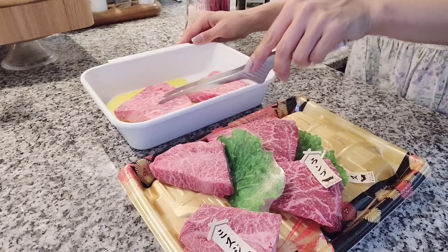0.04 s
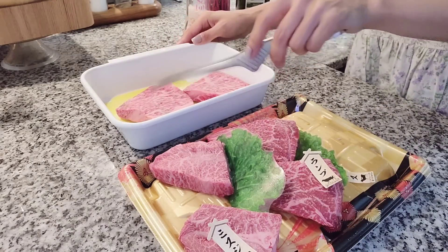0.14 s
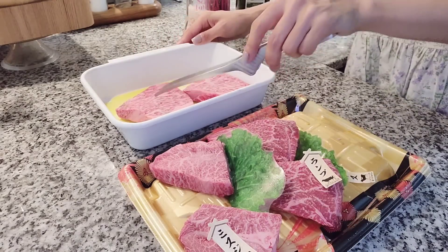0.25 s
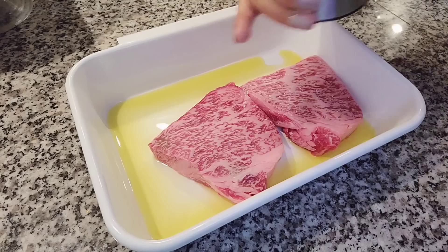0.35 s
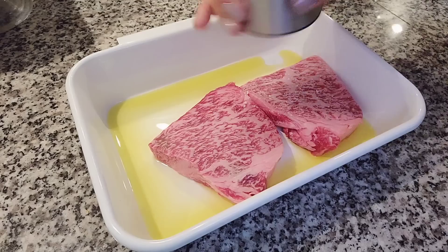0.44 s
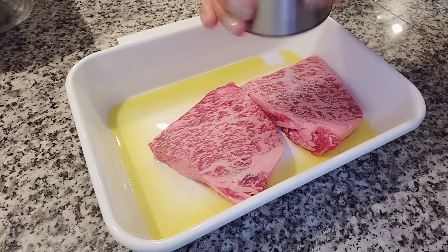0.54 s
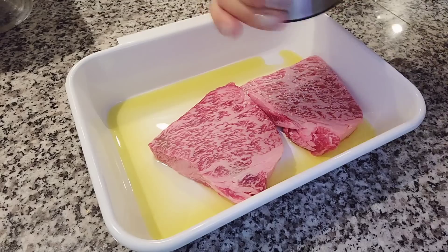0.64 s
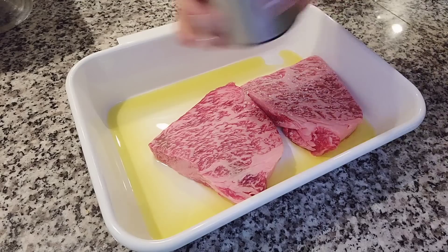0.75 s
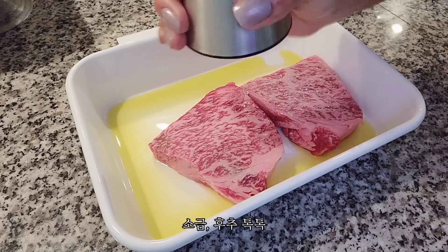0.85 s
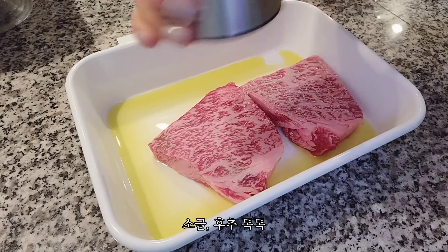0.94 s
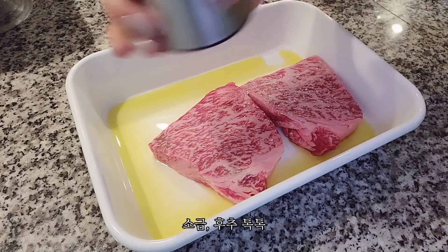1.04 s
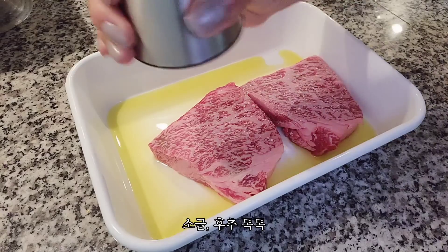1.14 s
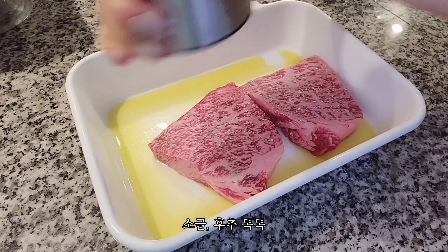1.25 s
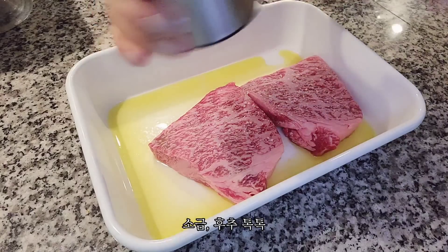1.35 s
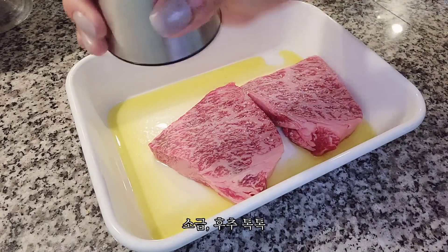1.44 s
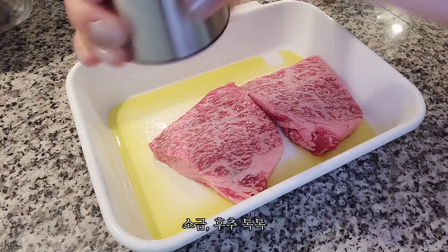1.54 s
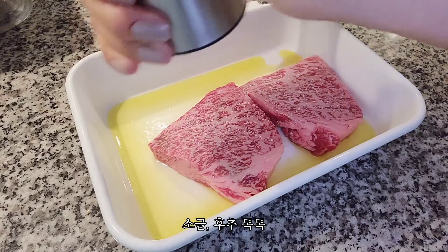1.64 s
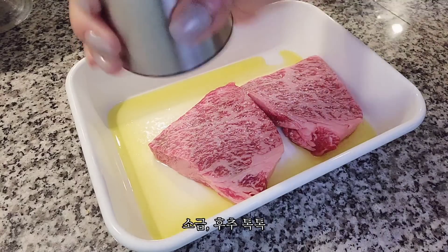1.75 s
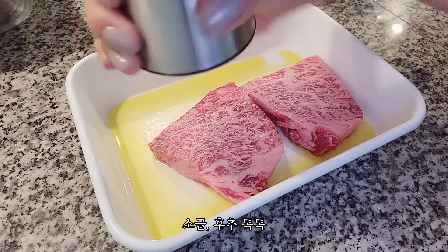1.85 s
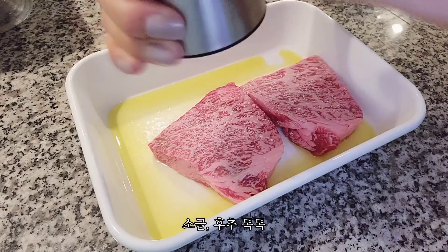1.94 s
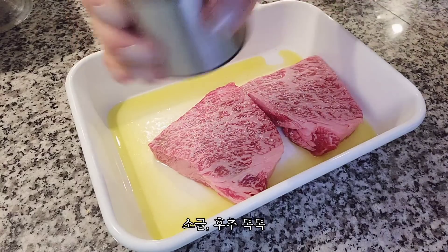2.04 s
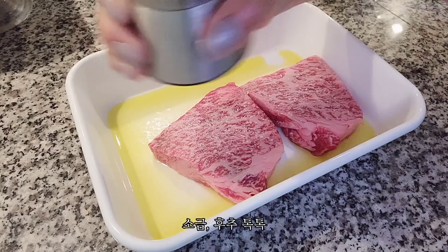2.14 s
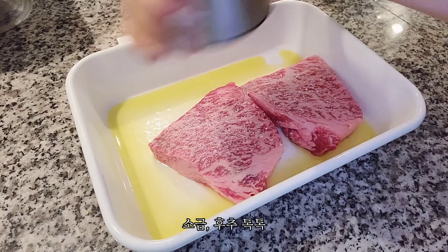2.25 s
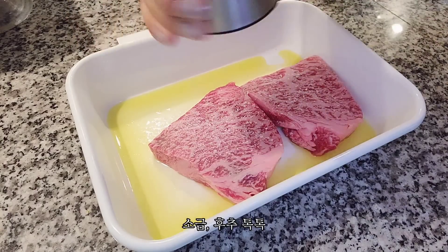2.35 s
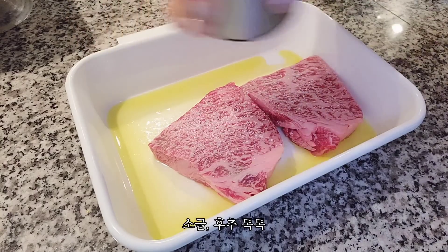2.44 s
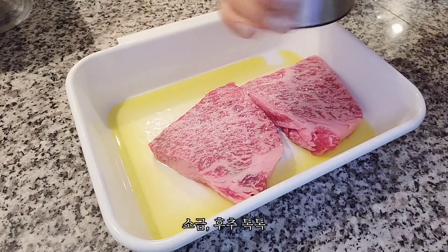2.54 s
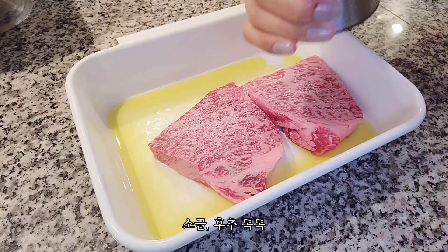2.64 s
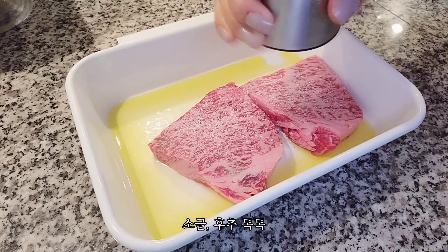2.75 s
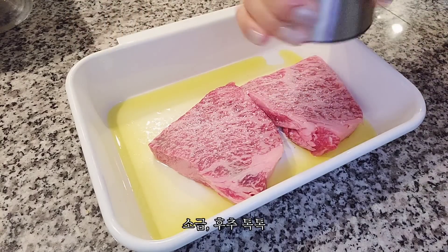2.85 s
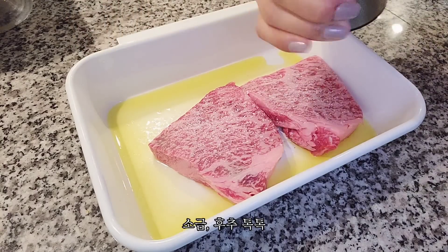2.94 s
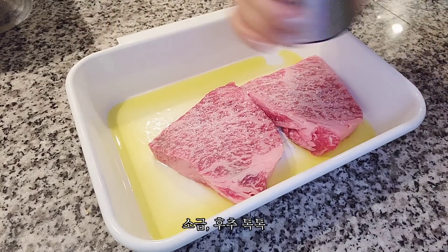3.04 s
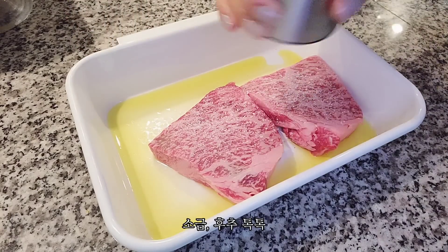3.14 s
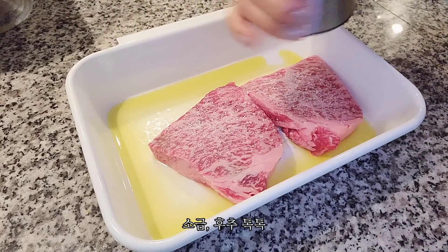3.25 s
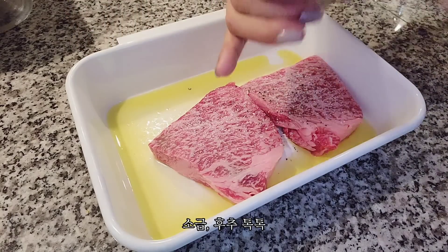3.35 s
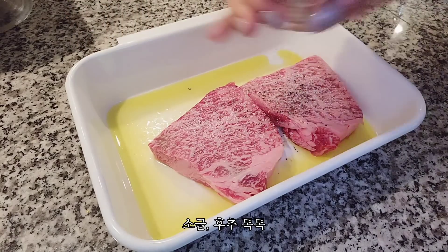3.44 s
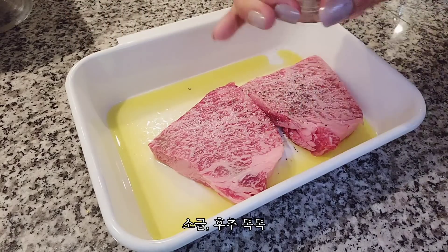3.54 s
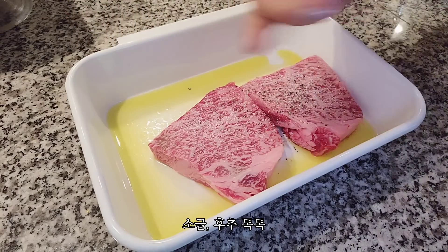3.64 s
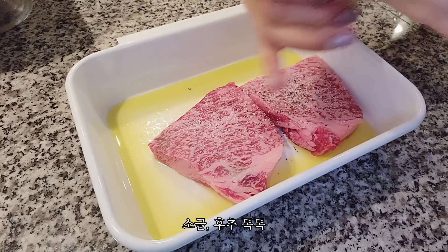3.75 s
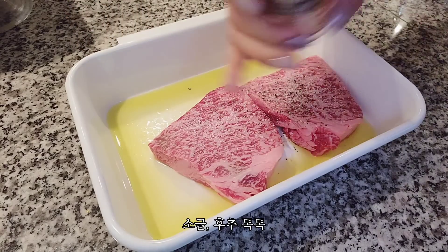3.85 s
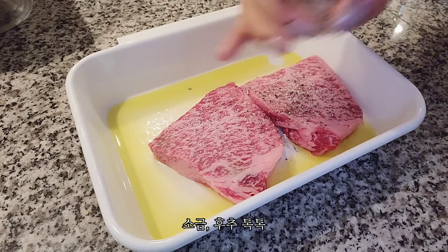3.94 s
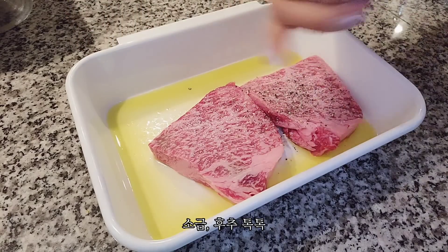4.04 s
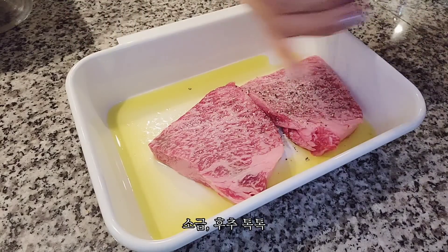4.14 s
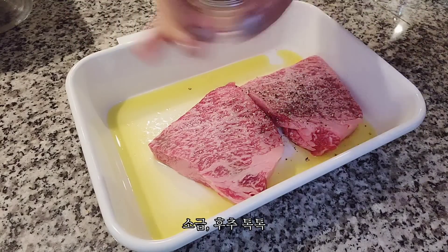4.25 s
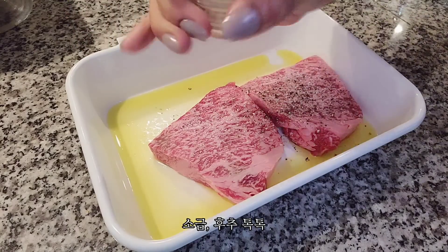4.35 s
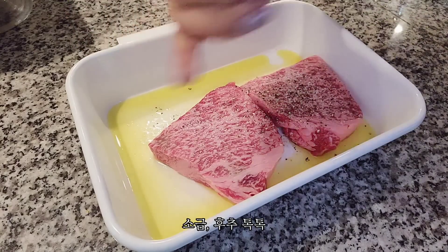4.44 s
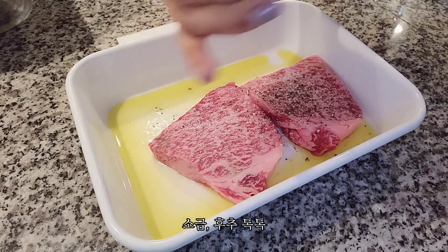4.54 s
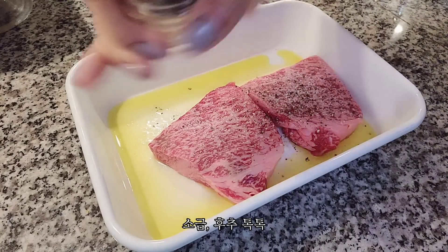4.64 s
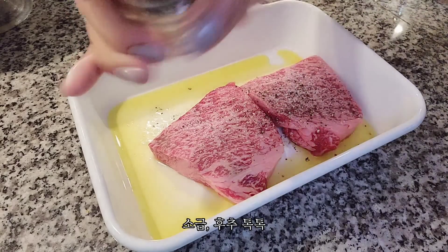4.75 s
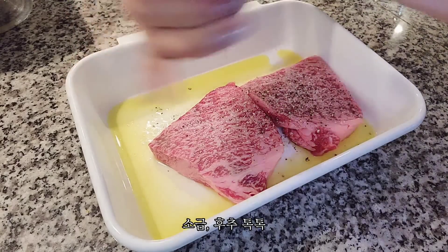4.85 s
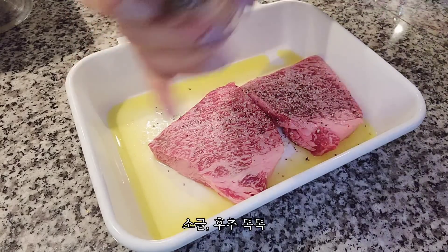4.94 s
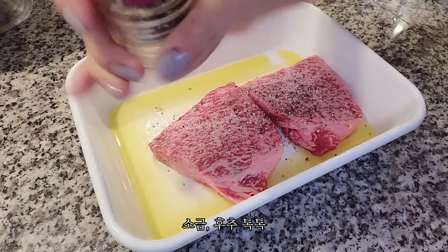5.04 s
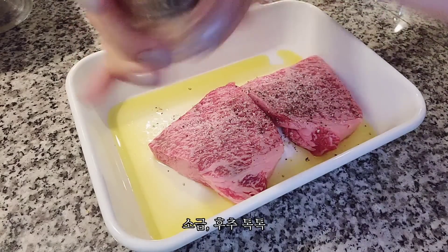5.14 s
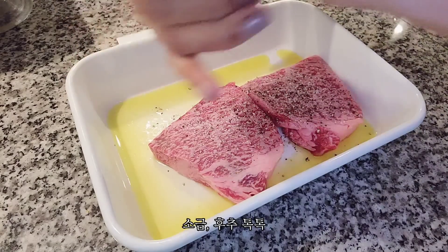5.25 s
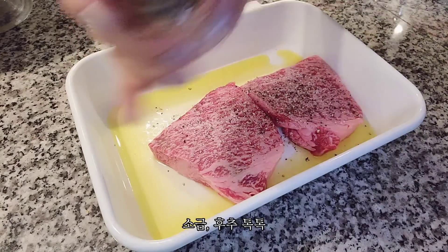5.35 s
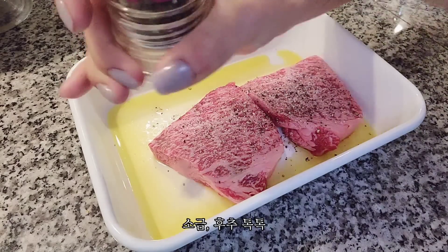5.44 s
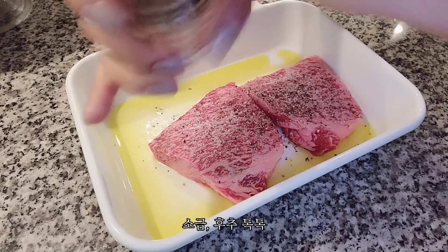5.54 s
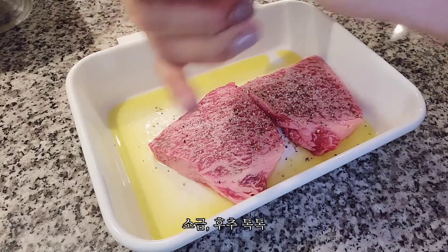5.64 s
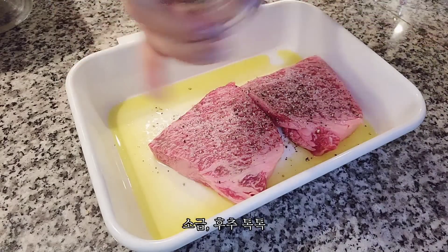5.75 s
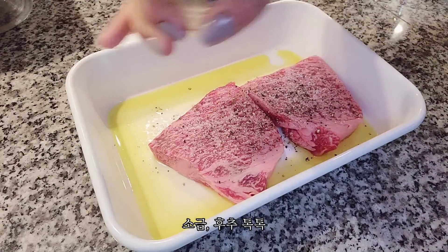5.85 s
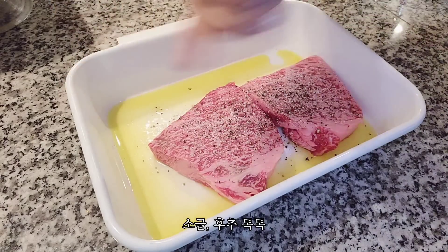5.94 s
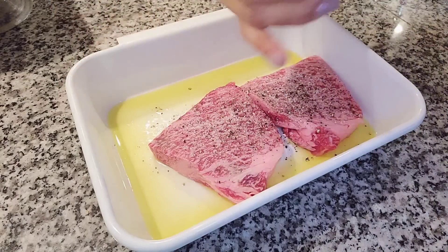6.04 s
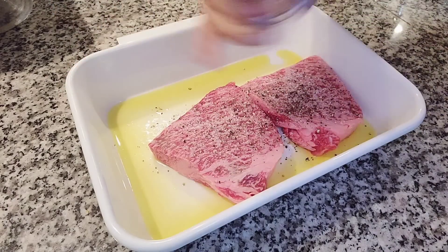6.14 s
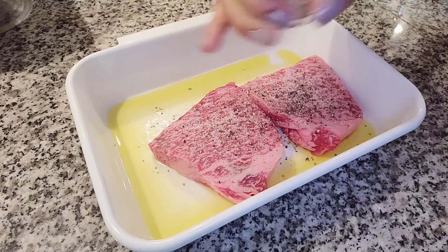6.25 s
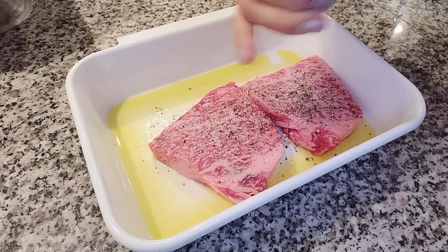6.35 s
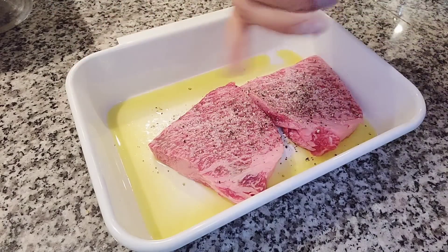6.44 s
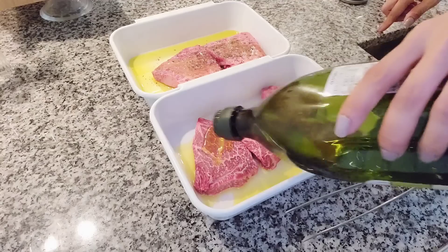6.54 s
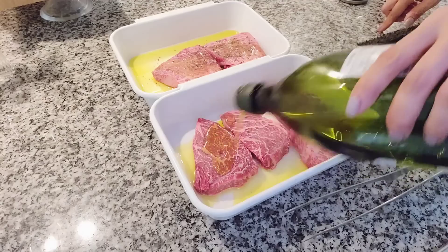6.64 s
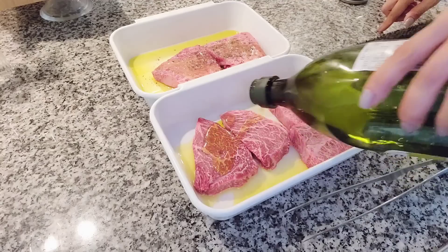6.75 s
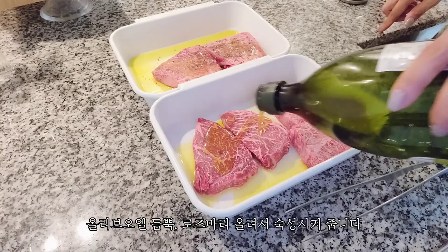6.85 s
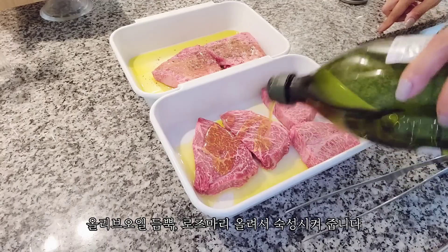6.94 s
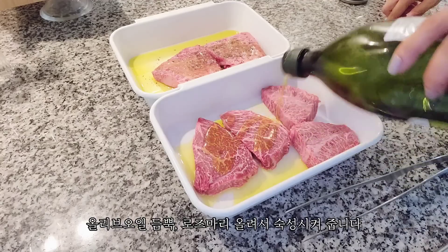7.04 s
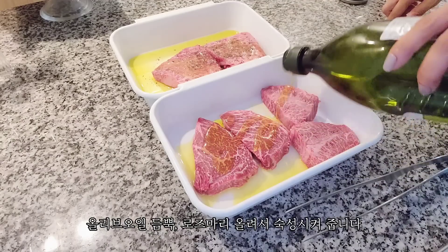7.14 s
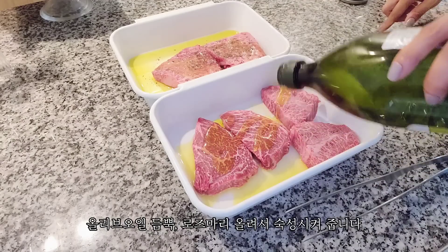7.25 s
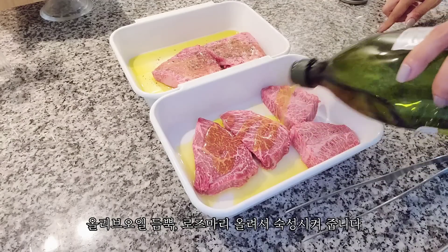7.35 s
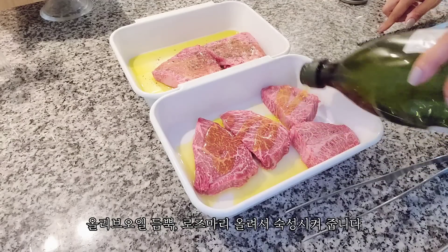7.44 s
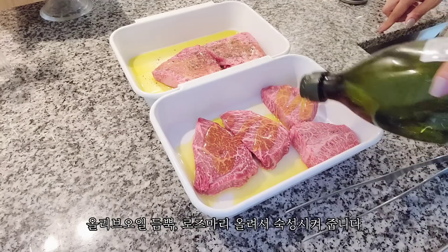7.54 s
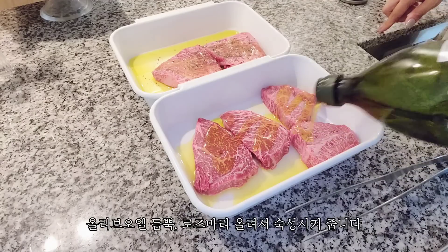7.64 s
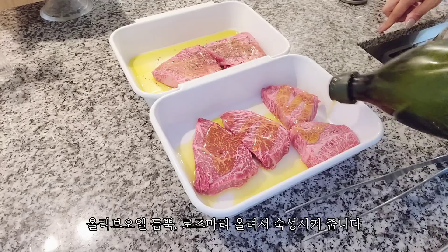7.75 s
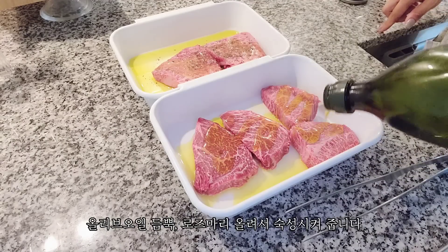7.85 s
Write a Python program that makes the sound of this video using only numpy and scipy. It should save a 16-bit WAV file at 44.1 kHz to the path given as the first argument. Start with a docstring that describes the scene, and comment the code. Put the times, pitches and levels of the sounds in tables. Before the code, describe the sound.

A quiet small kitchen, heard close in stereo, with a very soft low rumble, deep drone and barely audible far whine. From 0.4 seconds a salt mill is twisted ten times, roughly every third of a second until 3.4. Each twist is a crisp gritty crunch of about a tenth of a second, ringing hollow near two kilohertz, with fine crackles and an odd brighter ping; the first has a tiny squeak. Faint rubbing of the returning hand and small clicks fill the gaps. From about 3.7 a pepper mill takes over with eight slightly slower, longer twists, around 0.4 seconds apart: drier, rougher, less hollow, with hard snaps, notably near 3.7, 4.2 and 5.7, and brief falling burr chirps. The last, weaker twist comes at 6.4. Grinding stops at 6.6, leaving the faint room and two minute ticks near 7.6 and 7.9.

```python
"""Salt and pepper mills in a small kitchen

A salt mill is twisted ten times over a dish of meat, then a pepper mill eight times.
Each twist is noise shaped by random fractures, ringing the resonances of the mill's hollow mouth;
big grains crack singly as an impulse with pings, some with a higher ring, and the burr squeaks in glides.
The hand turns back with a soft rub of filtered noise, which dips before each twist, and some ticks.
Under it lie a low rumble of filtered noise, a deep drone, a soft hum and a faint far whine."""
import sys
import numpy as np
from scipy import signal
from scipy.fft import rfft, irfft
from scipy.io import wavfile
from scipy.ndimage import uniform_filter1d

SR = 44100
rng = np.random.default_rng(int(sys.argv[2]) if len(sys.argv) > 2 else 0)


def pcm_store(signal):
    """Save signal as 16-bit PCM."""
    levels = np.round(np.clip(np.atleast_2d(signal), -1, 1) * 32767)
    wavfile.write(sys.argv[1], SR, levels.astype(np.int16).T)


N = 348814
TIME = np.arange(N) / SR
BINS = np.fft.rfftfreq(4096, 1 / SR)  # filter design frequencies, Hz
PEPPER_FROM, MILL_FROM, MILL_TO = 3.55, .4, 6.598  # s
RING_S = .0015  # decay time of the rings in cracks() and ticks_and_rings()


def amp(db):
    """Logarithmic level: converts decibels to an amplitude gain."""
    return 10 ** (np.asarray(db) / 20)


def evened(x):
    """Power normalisation: scales to an rms of 1."""
    return x / np.sqrt(np.mean(x ** 2) + 1e-20)


def unit(x):
    """Energy normalisation: scales to an energy of 1."""
    return x / np.linalg.norm(x)


def read(points, hz):
    """Logarithmic frequency scale: interpolates a table along it."""
    f, value = np.transpose(points)
    return np.interp(np.log(hz + 1), np.log(f + 1), value)


def add(mix, s, sound):
    """Linear superposition: adds a sound into the mix from time s."""
    part = mix[round(s * SR):][:len(sound)]
    part += sound[:len(part)]


def drift(rate_hz):
    """Band-limited random motion: noise below rate_hz, of rms 1."""
    hz = np.fft.rfftfreq(N, 1 / SR)
    return evened(irfft(rfft(rng.standard_normal(N)) * (hz < rate_hz), N))


def ring_through(x, gain):
    """Minimum phase: filters x causally, with unit energy, by the response that has this gain."""
    both_sides = np.r_[gain, gain[-2:0:-1]]
    log_gain = np.log(np.maximum(both_sides, 1e-5))
    response = np.fft.ifft(np.exp(np.conj(signal.hilbert(log_gain)))).real[:len(gain)]
    return signal.oaconvolve(x, unit(response))[:len(x)]


def colour(x, points):
    """Spectral shaping: gives x the spectrum of a table."""
    return ring_through(x, amp(read(points, BINS)))


def dying(t, ring_s, rise_s=0.0001):
    """Damped resonance: the envelope of a ping, with a fast rise and an exponential decay."""
    return (1 - np.exp(-t / rise_s)) * np.exp(-t / ring_s)


# far whine in short and long swells, mostly sinking in pitch:
# (start t/s, length t/s, first f/Hz, last f/Hz, relative level/dB)
FAR_WHINE = [(0.094, 0.62, 770, 800, -63), (.97, 0.73, 763, 752, -57.5), (2.088, 0.33, 760, 726, -62),
             (2.367, 0.31, 747, 757, -53.5), (3.085, 2.5, 778, 743, -66.5),
             (4.859, 2.42, 767, 753.6, -70.5)]


def whine(waver_hz=4):
    """Frequency modulation: a faint far tone comes and goes, glides and wavers, and its level flickers."""
    out, waver = np.zeros(N), waver_hz * drift(rate_hz=30)
    for s, length, first_hz, last_hz, db in FAR_WHINE:
        count = int(length * SR)
        hz = np.linspace(first_hz, last_hz, count) + waver[int(s * SR):][:count]
        swell = np.sin(np.pi * np.linspace(0, 1, count) ** 0.47)
        add(out, s, amp(db) * swell * np.sin(2 * np.pi * np.cumsum(hz) / SR))
    return out * (1 + .45 * drift(rate_hz=14))


# spectrum of the room rumble: (f/Hz, relative level per Hz/dB)
ROOM_RUMBLE = [(15, -20), (35, -6), (55, -6), (100, -5), (160, -16.5), (220, -11), (330, -22.5), (550, -25),
               (780, -24), (1000, -33), (2500, -41), (7000, -50.5), (9000, -60), (14000, -52)]
# likeness of the rumble in the two channels: (f/Hz, correlation/1)
LEFT_RIGHT_LIKENESS = [(30, 0.84), (70, 1), (300, 0.89), (800, 0.31), (2000, 0.079)]
# swells of the deep drone: (centre t/s, half-length t/s, level/dB)
DRONE_SWELLS = [(0.922, 0.22, -47.5), (2.342, 0.11, -46.5)]
# soft, blurred hum: (f/Hz, level/dB)
SOFT_HUM = [(258, -62), (412, -66.5)]


def background(rumble_db=-54.5, drone_db=-58.5, drone_hz=39):
    """Partial coherence: rumble shared in part by the channels, with a drone, hum and whine in both."""
    hz = np.fft.rfftfreq(N, 1 / SR)
    a, b = rfft(rng.standard_normal((2, N)))
    alike = np.clip(read(LEFT_RIGHT_LIKENESS, hz), -1, 1)
    channels = np.array([a, alike * a + np.sqrt(1 - alike ** 2) * b])
    rumble = evened(irfft(channels * amp(read(ROOM_RUMBLE, hz)), N))

    swelling = sum(amp(db) * np.exp(-((TIME - s) / half_s) ** 2) for s, half_s, db in DRONE_SWELLS)
    drone = (amp(drone_db) * drift(rate_hz=2.3) + swelling) * np.sin(2 * np.pi * drone_hz * TIME)
    hum = sum(amp(db) * drift(rate_hz=30) * np.sin(2 * np.pi * f * TIME) for f, db in SOFT_HUM)
    return amp(rumble_db) * rumble + drone + whine() + hum * (TIME < MILL_TO)


def force(t, build_s, length_s, sag_db, sag_shape, bite_s=0.0052, grip_db=-14, release_db_per_s=812):
    """Time-varying excitation: the hand bites, builds up, sags (or rises if sag_db < 0) and lets go."""
    building = np.maximum(1 - t / build_s, 0)
    spent = np.clip((t - build_s) / max(length_s - build_s, .01), 0, 1)
    released_s = np.maximum(t - length_s, 0)
    bite = np.minimum(t / bite_s, 1) ** 1.9
    level_db = grip_db * building ** 1.8 - sag_db * spent ** sag_shape - release_db_per_s * released_s
    return bite * amp(level_db)


def grains(count, per_s, spread_db, dust, grain_s=.0007):
    """Shot noise: tiny fractures of uneven size over the hiss of fine dust, steady in power."""
    size = amp(spread_db * np.minimum(rng.exponential(1, count), 4))
    breaks = size ** 2 * (rng.random(count) < per_s / SR)
    power = signal.lfilter([1], [1, -np.exp(-2 / (grain_s * SR))], breaks)
    x = np.sqrt(power / (power.mean() + 1e-12) + dust ** 2) * rng.standard_normal(count)
    return x / np.sqrt(uniform_filter1d(x ** 2, size=800) + 1e-9)


def chips(count, per_s, spread_db, ring_s, low_hz, high_hz):
    """Random modal excitation: short pings at random times, sizes and pitches; rms 1."""
    out = np.zeros(count)
    t = np.arange(SR // 50) / SR
    candidates = 400
    for at, pitch, size, chance in rng.random((candidates, 4)):
        if chance < per_s * count / SR / candidates:
            hz = low_hz * (high_hz / low_hz) ** pitch
            ping = dying(t, ring_s) * np.sin(2 * np.pi * hz * t)
            add(out, at * count / SR, amp(spread_db * size) * ping)
    return evened(out)


# resonances of the mill's hollow mouth: (f over mouth pitch/1, width f/Hz, relative level/dB)
MOUTH_MODES = [(.58, 143.8, -8.5), (.72, 207, -10.5), (.94, 150, -35.5), (1.03, 195, 1.5)]


def mouth(x, hz):
    """Cavity resonance: rings the modes of the mill's hollow mouth."""
    power = sum(amp(db) ** 2 / (1 + ((BINS - hz * ratio) / width) ** 2) ** 2
                for ratio, width, db in MOUTH_MODES)
    return ring_through(x, np.sqrt(power))


def mouth_ring(x, push, hz, ping_db, spread=0.051):
    """Forced and free vibration: the mouth rings with the stream and pings with larger grains."""
    pings = chips(len(x), per_s=170, spread_db=4.5, ring_s=0.0023,
                  low_hz=hz * (1 - spread), high_hz=hz * (1 + spread))
    return mouth(x, hz) + amp(ping_db) * pings * push


def treble(x, db, corner_hz=5000):
    """Zero-phase shelving: lifts or lowers the treble."""
    highpass = signal.butter(2, corner_hz, "high", fs=SR, output="sos")
    return x + (amp(db) - 1) * signal.sosfiltfilt(highpass, x)


# one row a twist: (start t/s, build-up t/s, length t/s, mouth ring relative level/dB,
# burr crunch relative level/dB, crunch treble level/dB, sag by the end level/dB, mouth pitch f/Hz,
# lead at the right microphone t/ms)
MILL_TWISTS = [(.397, 0.0055, .068, -22, -30.5, -1, 7, 1980, .051),
               (.681, 0.045, 0.11, -21.5, -27, -3.5, 5.5, 2020, .049),
               (1.012, 0.035, 0.12, -21, -27.5, -2.5, 10, 1904, .14),
               (1.324, 0.039, 0.099, -23.5, -30.5, -2, -1, 1926, .18),
               (1.653, 0.02, 0.1, -22.5, -28.5, 1, 7.5, 1880, .18),
               (1.984, 0.031, 0.11, -21, -27.5, -2.5, 18, 1900, .16),
               (2.304, 0.038, .115, -22, -26, -3.5, 7.5, 1940, .15),
               (2.636, 0.056, 0.11, -22.5, -31, 0, 5.5, 1996, .053),
               (2.973, 0.06, 0.11, -19.5, -30, -2, 10.5, 1914, .032),
               (3.325, 0.041, 0.091, -23.5, -29, 0, 11, 1980, .05),
               (3.686, 0.13, .16, -31.5, -30.5, 4, 10, 2044, .012),
               (4.133, 0.041, 0.15, -26.5, -30, 4.5, 28.5, 2070, .036),
               (4.497, 0.077, 0.12, -38, -33.5, 1, 8.5, 1940, .14),
               (4.883, 0.02, .12, -28, -24.5, -0.5, 14, 1830, .15),
               (5.267, .029, 0.11, -28.5, -25, 0.5, 15, 1940, .13),
               (5.631, 0.02, .17, -32.5, -28.5, -7, 9, 1950, .18),
               (6.034, 0.071, 0.14, -31, -29.5, 5, 22.5, 1910, .045),
               (6.426, 0.029, 0.11, -40.5, -33.5, -1, -1.5, 1950, .1)]
# spectra of crushing salt and pepper: (f/Hz, relative level per Hz/dB)
SALT_CRUNCH = [(200, -15.5), (600, -24.5), (1150, -24), (2500, -7.5), (3400, 3), (3850, -7), (4900, -1.5),
               (5800, -10), (7300, -7), (8400, -14), (13000, -21), (16000, -29.5)]
PEPPER_CRUNCH = [(200, -12), (550, -14), (950, -9.5), (1350, -7), (2300, -10), (2850, 2), (3700, 0),
                 (4350, 1), (5100, -0.5), (7300, -6), (8500, -13.5), (13000, -12), (16000, -19.5)]


def twists(twist_s=.25):
    """Source and resonator: crumbling grains drive the mouth; salt sags late in a twist, pepper early."""
    out = np.zeros(N)
    t = np.arange(0, twist_s, 1 / SR)
    for s, build_s, length_s, ring_db, crunch_db, treble_db, sag_db, hz, _ in MILL_TWISTS:
        if s < PEPPER_FROM:
            push = force(t, build_s, length_s, sag_db, sag_shape=1.25)
            stream = grains(len(t), per_s=320, spread_db=4.5, dust=.3) * push
            splinters = chips(len(t), per_s=460, spread_db=11.5, ring_s=.0016, low_hz=2500, high_hz=7630)
            ring = amp(-7) * mouth_ring(stream, push, hz, ping_db=-3.5)
            crunch = amp(2.5) * colour(stream, SALT_CRUNCH) + amp(-3) * splinters * push
        else:
            push = force(t, build_s, length_s, sag_db, sag_shape=0.41)
            stream = grains(len(t), per_s=260, spread_db=4.5, dust=.3) * push
            splinters = chips(len(t), per_s=320, spread_db=12.0, ring_s=0.0019, low_hz=2550, high_hz=7600)
            ring = amp(-2.0) * mouth_ring(stream, push, hz, ping_db=-2.5)
            crunch = amp(-0.05) * colour(stream, PEPPER_CRUNCH) + amp(-5.5) * splinters * push
        add(out, s, amp(ring_db) * ring + amp(crunch_db) * treble(crunch, treble_db))
    return out


# narrow resonances of the mills' bodies: (f/Hz, width f/Hz, level over the crunch/dB)
SALT_MILL_BODY = [(1093, 39, 3.5), (1870, 92, 4), (4700, 16, 4), (5720, 160, 5), (7635, 50, 6.5)]
PEPPER_MILL_BODY = [(1390, 90, 5.1), (1965, 140, 3.2), (2790, 37, 2.2), (3298, 51, 9.6), (4294, 67, 2.5),
                    (7500, 40, 7.6)]


def body(x, modes):
    """Structural resonance: lifts the narrow modes of a mill's body."""
    lift = sum((amp(db) ** 2 - 1) / (1 + ((BINS - hz) / width) ** 2) ** 2 for hz, width, db in modes)
    return ring_through(x, np.sqrt(1 + lift.clip(-.9)))


def turning_back(rest_ahead_s=0.077, rest_s=0.022, rest_db=-8, pepper_db=4.0):
    """Friction level in dB: the hand rests just before each twist; the pepper mill rubs harder."""
    resting = sum(np.exp(-((TIME - s + rest_ahead_s) / rest_s) ** 2) for s, *_ in MILL_TWISTS)
    return rest_db * resting + pepper_db * (TIME > PEPPER_FROM)


# fingers sliding to a new grip and loose grains shifting: (centre t/s, relative level/dB)
GRIP_SWISHES = [(.66, -50), (0.957, -47), (1.545, -55), (1.627, -57), (1.939, -51.5), (2.594, -59.5),
                (2.858, -47.5), (3.6, -55), (4.41, -54.5), (4.861, -51.5), (5.101, -51.5), (5.226, -46.5),
                (5.966, -55.5)]
# spectrum of the sliding fingers: (f/Hz, relative level per Hz/dB)
SWISH_COLOUR = [(500, -9), (4200, -7), (5700, 1), (7400, -2), (8600, -7), (16000, -10)]


def handling(half_s=.009, rub_db=-63):
    """Sliding friction: a faint rub of the burr, and small swells of fingers and loose grains."""
    held = (TIME > MILL_FROM) & (TIME < MILL_TO)
    friction = grains(N, per_s=260, spread_db=4, dust=.8) * held
    rub = friction * amp(rub_db + turning_back() + 2.2 * drift(rate_hz=7.7))
    swelling = np.zeros(N)
    t = np.arange(-3 * half_s, 3 * half_s, 1 / SR)
    for s, db in GRIP_SWISHES:
        add(swelling, s + t[0], amp(db) * np.exp(-(t / half_s) ** 2))
    return colour(rub + friction * swelling, SWISH_COLOUR)


# the burr slipping: (start t/s, length t/s, first f/Hz, last f/Hz, relative level/dB)
BURR_SQUEAKS = [(0.439, .036, 3457, 3260, -24.5), (4.24, .013, 2060, 2050, -32),
                (4.604, .018, 2060, 1277, -26), (5.003, .011, 1850, 1570, -30),
                (5.369, .011, 2010, 1610, -26.5), (6.145, .022, 2004, 1880, -35.5)]


def squeaks(overtone_db=-9, jitter=.03):
    """Stick-slip vibration: short sinking chirps of two harmonics with a shaking pitch."""
    out = np.zeros(N)
    for s, length, first_hz, last_hz, db in BURR_SQUEAKS:
        count = int(length * SR)
        shake = evened(uniform_filter1d(rng.standard_normal(count), size=40))
        hz = np.linspace(first_hz, last_hz, count) * (1 + jitter * shake)
        phase = 2 * np.pi * np.cumsum(hz) / SR
        tone = np.sin(phase) + amp(overtone_db) * np.sin(2 * phase)
        add(out, s, amp(db) * signal.windows.tukey(count, .5) * tone)
    return out


def fracture(decay_s, crumble):
    """Impulsive excitation: a sharp break with a quickly dying crumble; energy 1."""
    t = np.arange(SR // 50) / SR
    burst = crumble * rng.standard_normal(len(t)) * np.exp(-t / decay_s)
    burst[0] += 1
    return unit(burst)


# single grains breaking: (t/s, mouth ring relative level/dB, snap relative level/dB)
GRAIN_CRACKS = [(0.445, -38, -31), (0.72, -29, -30), (0.7643, -26.0, -35.0), (0.7722, -23, -33),
                (1.0259, -27.5, -25.0), (1.0476, -24.5, -37), (1.0545, -28, -36), (1.0618, -19.5, -33),
                (1.069, -22.0, -39), (1.0868, -17.5, -41.5), (1.1553, -29, -19.0), (1.1601, -47.5, -20),
                (1.1783, -54, -26.5), (1.326, -36, -38.5), (1.3764, -17.5, -39), (1.3841, -20, -28),
                (1.6742, -23, -32), (1.6991, -23.5, -42), (1.7177, -24, -33), (1.7344, -37, -23),
                (2.0267, -25, -20), (2.0322, -38, -26.5), (2.3183, -24.5, -31.0), (2.342, -23, -29.0),
                (2.3544, -25, -29), (2.3658, -23, -33), (2.3728, -27.0, -43), (2.6796, -27.5, -25.5),
                (2.71, -27.5, -37), (3.0284, -17.5, -32), (3.0398, -27.0, -38), (3.055, -27, -31),
                (3.357, -39, -30.5), (3.7216, -46, -14), (3.7304, -34.0, -13.5), (3.791, -26, -17.5),
                (3.8127, -29, -31), (4.1398, -44, -36), (4.1694, -23.5, -12), (4.5483, -44.0, -22.5),
                (4.556, -27, -27), (4.5633, -32, -27), (4.8944, -34, -23.0), (4.9648, -30, -29),
                (4.9798, -25, -23.5), (5.2563, -43, -38.5), (5.2827, -33.5, -28.5), (5.287, -23.5, -23.5),
                (5.3002, -35, -26.0), (5.3249, -33.0, -20.5), (5.6489, -32.0, -26.5), (5.6938, -51, -12),
                (5.702, -41, -13.5), (5.7072, -25.5, -13), (6.07, -23.5, -25), (6.087, -29, -16),
                (6.4543, -37.5, -36.5), (6.5225, -42, -34), (6.5408, -47.5, -36.0)]
# spectrum of a grain's snap: (f/Hz, relative level per Hz/dB)
SNAP_COLOUR = [(200, -23.5), (600, -22), (950, -17.5), (1400, -14.5), (2300, -10), (2950, -4), (3600, -3),
               (4300, -0.5), (5000, -6), (5800, -1), (7400, -2.5), (8300, -7.5), (9500, -14.5),
               (12500, -12.5), (16000, -25.5)]


def cracks(stray=0.034):
    """Impulse response: each large grain snaps with its own ping and briefly rings the mouth."""
    ring, pings, snaps = np.zeros((3, N))
    t = np.arange(SR // 30) / SR
    for s, ring_db, snap_db in GRAIN_CRACKS:
        snap_hz = rng.uniform(4200, 7400)
        mouth_hz = [row[7] for row in MILL_TWISTS if row[0] <= s][-1]  # of the latest twist
        hz = mouth_hz * (1 + stray * rng.standard_normal())
        mouth_ping = dying(t, RING_S, rise_s=0.00064) * np.sin(2 * np.pi * hz * t)
        grain_ping = dying(t, ring_s=.0012) * np.sin(2 * np.pi * snap_hz * t)
        add(ring, s, amp(ring_db) * unit(mouth_ping))
        add(pings, s, amp(snap_db) * unit(grain_ping))
        add(snaps, s, amp(snap_db) * fracture(decay_s=.0009, crumble=.3))
    return amp(26.5) * ring + amp(20) * pings + amp(24) * colour(snaps, SNAP_COLOUR)


# clicks of the mill, and the higher rings of some large cracking grains:
# (t/s, ring f/Hz, ring relative level/dB, knock relative level/dB)
TICKS_AND_RINGS = [(.507, 2910, -34, -33), (0.9417, 3500, -55.5, -45), (1.1558, 2620, -17, -22.5),
                   (2.6517, 3400, -24.5, -46.5), (2.813, 1390, -41, -38), (2.821, 3280, -28, -36.5),
                   (3.6778, 3150, -38.5, -30), (3.792, 2860, -14.5, -33), (3.9217, 2980, -33.5, -38),
                   (3.936, 2055, -37.5, -35), (4.626, 2560, -22, -33), (7.5518, 3410, -64, -45.5),
                   (7.8774, 1370, -54, -57)]
# spectrum of a dry knock: (f/Hz, relative level per Hz/dB)
KNOCK_COLOUR = [(300, -11.5), (1400, -1.5), (1950, -0.5), (2400, -0.5), (4000, -2.5), (7300, -6.5),
                (9000, -15), (16000, -21)]


def ticks_and_rings():
    """Impact excitation: clicks of the mill and some large grains, each a dry knock with a brief ring."""
    knocks, ring = np.zeros((2, N))
    t = np.arange(SR // 30) / SR
    for s, hz, ring_db, knock_db in TICKS_AND_RINGS:
        add(knocks, s, amp(knock_db) * fracture(decay_s=0.0045, crumble=0.47))
        add(ring, s, amp(ring_db) * dying(t, RING_S, rise_s=0.00072) * np.sin(2 * np.pi * hz * t))
    return amp(19) * colour(knocks, KNOCK_COLOUR) + amp(11.0) * ring


def scatter(decay, start_s):
    """Diffuse reflection: sparse taps of random sign, each band dying at its own speed; energy 1."""
    t = np.arange(SR // 3) / SR
    taps = rng.choice([-1., 1.], len(t)) * (rng.random(len(t)) < 5000 / SR) * (t > start_s)
    hz, at, z = signal.stft(taps, SR, nperseg=128)
    tail = signal.istft(z * amp(-60 * at / read(decay, hz)[:, None]), SR)[1][:len(t)]
    return unit(tail)


# reverberation time of the kitchen: (f/Hz, time for a 60 dB decay t/s)
KITCHEN_DECAY = [(300, 0.073), (2000, 0.19), (6000, 0.2), (15000, 0.043)]


def space(x, near_db=-7, room_db=-20, direct_db=-7, wander_hz=60, wander_rad=0.72, near_t60_s=.04):
    """Early and late reflections: as the mill moves, dish, counter and room answer each twist anew."""
    out = np.zeros((2, N))
    edges = [0, *(int(row[0] * SR) for row in MILL_TWISTS[1:]), int(MILL_TO * SR), N]
    leads_ms = [row[8] for row in MILL_TWISTS] + [0]
    # direct sound and reflections of the twists stop dead at MILL_TO
    heard = np.clip((edges[-2] - np.arange(N)) / 200, 0, 1)
    # grains break all round the burr: the sound wanders between two sets of reflections
    angle = wander_rad * drift(rate_hz=wander_hz)
    sides = x * np.cos(angle), x * np.sin(angle)
    for a, b, lead_ms in zip(edges, edges[1:], leads_ms):
        left_delay = round(max(lead_ms, 0) * SR / 1000)
        for channel, delay in zip(out, (left_delay, 0)):
            sound = 0
            for side in sides:
                near = amp(near_db) * scatter([(1000, near_t60_s)], start_s=.0004)
                room = amp(room_db) * scatter(KITCHEN_DECAY, start_s=0.0047)
                sound = sound + signal.fftconvolve(side[a:b], near + room)
            sound[delay:delay + b - a] += amp(direct_db) * x[a:b]
            add(channel, a / SR, sound if b == N else sound * heard[a:a + len(sound)])
    return out * amp([[.3], [-.3]])  # left, right balance in dB


def scene():
    """Superposition of sources: both mills in the kitchen over its background."""
    grinding = twists() + cracks()
    salt_mill = body(grinding * (TIME < PEPPER_FROM), SALT_MILL_BODY)
    pepper_mill = body(grinding * (TIME >= PEPPER_FROM), PEPPER_MILL_BODY)
    return space(salt_mill + pepper_mill + squeaks() + ticks_and_rings() + handling()) + background()


def record(dry, edge_hz=16300):
    """Clipping and band limitation: peaks are cut at 0.88, then a linear-phase low-pass follows."""
    lowpass = signal.firwin(511, edge_hz, window=("kaiser", 9), fs=SR)
    return signal.oaconvolve(np.clip(dry, -.88, .88), lowpass[None], "same")


dry = scene()
out = record(dry)
pcm_store(out)
```